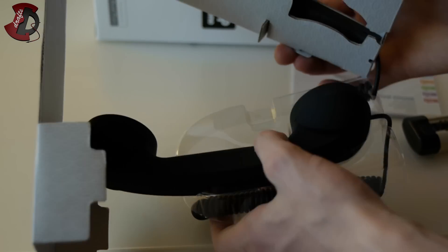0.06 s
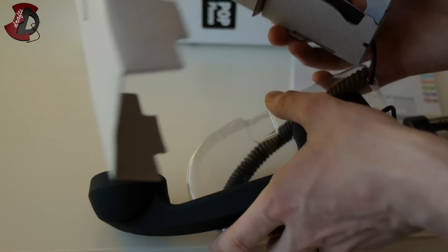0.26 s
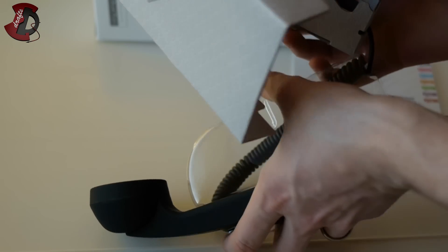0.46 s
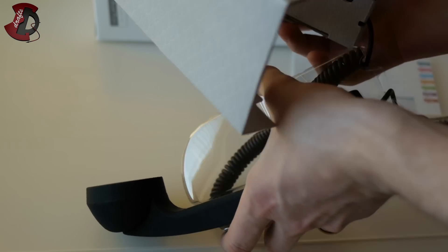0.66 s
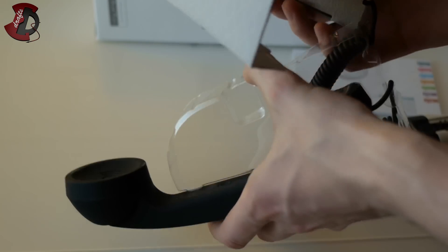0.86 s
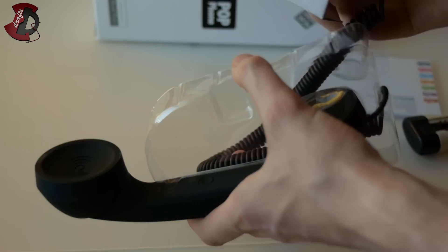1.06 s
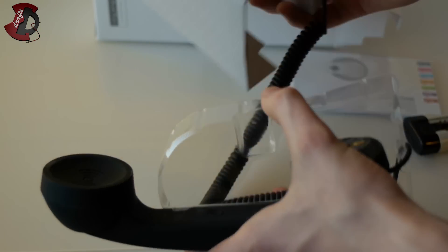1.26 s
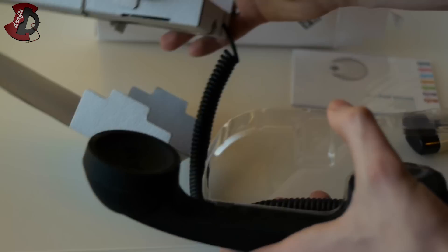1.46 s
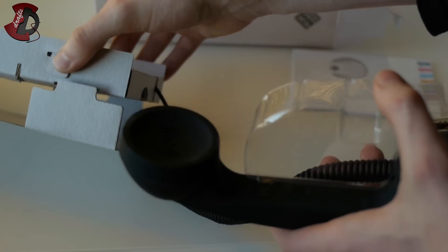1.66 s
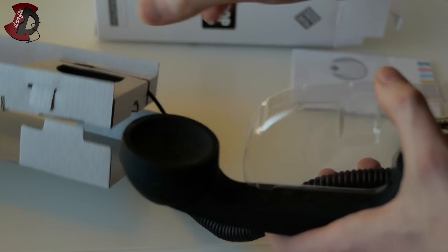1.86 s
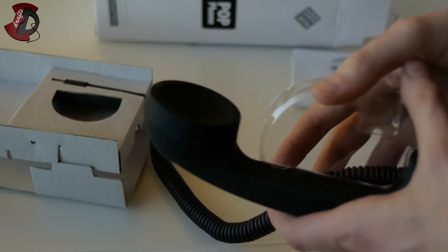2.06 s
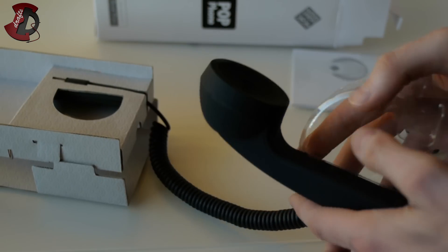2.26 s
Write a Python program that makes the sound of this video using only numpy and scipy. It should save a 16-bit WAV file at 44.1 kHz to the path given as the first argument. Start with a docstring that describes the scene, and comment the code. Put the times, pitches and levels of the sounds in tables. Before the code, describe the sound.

A hard plastic handset thuds onto a table. Cardboard slides and a thin plastic tray crackles, then a box lands and rocks. Softer knocks, snaps and a short scrape follow, heard close in a small, slightly echoing room.

```python
"""A plastic handset and a cardboard box are unpacked on a table in a small, echoing room.
First a thin plastic tray snaps as it buckles in the hands, and at 0.2 s the handset thuds down.
Card slides over card, catching and slipping, and the tray crackles again, loudest at 0.8 s.
At 1.4 s the box is put down and rocks. Around 2 s the handset knocks twice more, softly.
Last, the tray snaps again and fingers bump it, with a short scrape."""
import sys
import numpy as np
from scipy import signal
from scipy.fft import rfft, irfft
from scipy.io import wavfile
from scipy.ndimage import uniform_filter1d, minimum_filter1d

SR = 44100
rng = np.random.default_rng(int(sys.argv[2]) if len(sys.argv) > 2 else 0)


def file_out(sig):
    """Save sig as 16-bit WAV at sys.argv[1]."""
    # one column per channel
    cols = np.atleast_2d(sig).T
    # limit, then scale
    lim = np.clip(cols, -1, 1)
    pcm = np.round(lim * 32767).astype(np.int16)
    wavfile.write(sys.argv[1], SR, pcm)


N = 105840  # 2.4 seconds


def undb(db):
    """Turn decibels into a number to multiply by."""
    return 10 ** (np.asarray(db) / 20)


def fade(t60):
    """A smooth fade that is 60 dB down after t60 seconds."""
    return np.exp(-np.log(1000) * np.arange(N) / SR / t60)


def add(track, start_s, sound):
    """Mix a sound into a track."""
    i = int(np.clip(start_s * SR, 0, N - 1))
    track[:, i:i + sound.shape[-1]] += sound[..., :N - i]


def through(x, response):
    """Let every sample of x set off a copy of the response (convolution)."""
    return signal.fftconvolve(np.atleast_2d(x), np.atleast_2d(response), axes=1)[:, :N]


def gains(points, size):
    """Join (Hz, dB) points into a gain for every frequency."""
    hz, db = np.array(points).T
    log_hz = np.log(np.fft.rfftfreq(size, 1 / SR) + 1)
    return undb(np.interp(log_hz, np.log(hz), db))


def colour(x, points, size=4096):
    """Shape the tone with (Hz, dB) points; white noise keeps its power."""
    cepstrum = irfft(np.log(gains(points, size)))
    cepstrum[1:size // 2] *= 2  # folded so the filter never sounds early
    cepstrum[size // 2 + 1:] = 0
    response = irfft(np.exp(rfft(cepstrum)))
    return through(x, response / np.linalg.norm(response))


# Stereo width. Each row: frequency in Hz, level of the sides against the middle in dB.
STEREO_WIDTH = [(40, -14.5), (125, -23.5), (250, -33.5), (500, -16.5), (1000, -9.5), (2000, -4.5),
                (16000, -1)]
def noise(size=N):
    """Stereo white noise, alike in both ears in the bass and wide in the treble."""
    mid, side = rfft(rng.standard_normal((2, size)))
    width = gains(STEREO_WIDTH, size)
    left_right = np.array([mid + width * side, mid - width * side])
    return irfft(left_right / np.hypot(1, width), size)


def puff(t60, size=16384):
    """A puff of noise that dies away."""
    return noise(size) * fade(t60)[:size]


# Tone of the background. Each row: frequency in Hz, boost or cut in dB.
BACKGROUND_TONE = [(25, -54), (55, -4), (95, 6), (160, -1.5), (330, 6.5), (700, -5.5), (2000, -8.5),
                   (6000, -17), (11000, -24), (16000, -23.5)]
def background():
    """A faint, steady, low rush fills the room."""
    return undb(-59.5) * colour(noise(), BACKGROUND_TONE)


# Tone of the echo. Each row: frequency in Hz, boost or cut in dB.
ECHO_TONE = [(60, -23.5), (250, 11.5), (600, 5.5), (1500, -2), (5500, -1.5), (10000, -3.5), (16000, -8)]
def room_echo(onset_s=0.0013, low_t60=0.38, treble_t60=0.28):
    """The walls answer a click within milliseconds; the treble dies sooner."""
    wash = noise()
    low = signal.sosfilt(signal.butter(1, 7000, fs=SR, output="sos"), wash)
    tail = low * fade(low_t60) + (wash - low) * fade(treble_t60)
    tail *= 1 - np.exp(-(np.arange(N) / SR / onset_s) ** 2)
    return colour(tail / np.linalg.norm(tail[0]), ECHO_TONE)


# Sliding strokes. Each row: peak time, rise and fall in seconds, level in dB.
# One rise before the peak, or one fall after it, a stroke has 37% of its strength.
SLIDES = [(0.121, 0.029, 0.0093, -47.5), (0.156, 0.013, 0.022, -35.5), (0.471, 0.05, 0.097, -53.5),
          (0.627, 0.014, 0.0069, -50.5), (0.707, 0.037, 0.039, -47.5), (0.781, 0.0052, 0.035, -44.5),
          (0.888, 0.023, 0.025, -63), (1.234, 0.014, 0.023, -59.5), (1.551, 0.0038, 0.048, -48.5),
          (1.644, 0.015, 0.034, -50), (1.77, 0.029, 0.0089, -58.5), (1.946, 0.0053, 0.039, -53),
          (2.065, 0.044, 0.12, -50), (2.155, 0.014, 0.024, -34), (2.286, 0.0035, 0.022, -31)]
# Tone of the sliding. Each row: frequency in Hz, boost or cut in dB.
SLIDE_TONE = [(100, -15.5), (420, -1), (850, -1), (1900, 2), (3400, -0.5), (4400, -2.5), (5400, 0.5),
              (7800, -12), (10500, -9.5), (13000, -18), (16000, -18.5)]
def sliding(catches_per_s=700, spread_db=2.5, hiss_db=-1.5):
    """Sliding card and plastic catch and slip in many tiny clicks over a soft hiss."""
    t = np.arange(N) / SR
    effort = sum(undb(db) * np.exp(-np.maximum((peak - t) / rise, (t - peak) / fall))
                 for peak, rise, fall, db in SLIDES)
    catches = rng.random(N) < catches_per_s / SR
    strength = undb(spread_db * np.minimum(rng.exponential(size=N), 5))
    grains = np.sqrt(np.abs(through((catches * strength) ** 2, fade(0.004))))
    clicks = grains / grains.std() / 2 * noise()
    return colour(effort * (clicks + undb(hiss_db) * noise()), SLIDE_TONE)


def ping(hz, t60, sag=0.064, size=8192):
    """One brief note that starts a little high and sags, as thin plastic does when it relaxes."""
    level = fade(t60)[:size]
    pitch_hz = hz * (1 + sag * (level - .5))
    phase = 2 * np.pi * np.cumsum(pitch_hz) / SR
    return np.sqrt(2) * np.sin(phase + rng.uniform(0, np.pi, (2, 1))) * level


# Fingers bumping the tray. Each row: start in seconds, level in dB.
FINGER_BUMPS = [(2.2842, -38.5), (2.294, -35), (2.329, -44)]
# Notes of the whole tray. Each row: pitch in Hz, dB added to the bump's level.
TRAY_NOTES = [(415, -2.5), (885, 3.5), (990, -2), (1590, 3.5), (1940, -2)]
def tray_bumps():
    """Fingers knock the hollow tray; it rings, and the hands quickly damp it."""
    bumps = np.zeros((2, N))
    for start, db in FINGER_BUMPS:
        ring = sum(undb(note_db) * ping(hz, t60=0.064) for hz, note_db in TRAY_NOTES)
        add(bumps, start, undb(db) * ring)
    return bumps


def crackle(t60, step_s=0.0006, spread_db=7):
    """A crease gives way in tiny steps of uneven strength."""
    burst = puff(t60)
    size = burst.shape[1]
    step = (np.arange(size) / SR / step_s).astype(int)
    strength = undb(spread_db * rng.uniform(-1, 1, size))
    return burst * strength[step] / np.sqrt(np.mean(strength ** 2))


# Tray snaps, plus two brief bright rings near 1.65 s as the box scrapes and rocks. Each row: start in
# seconds, level in dB, ring pitch in Hz, dB added for the ring, left minus right in dB.
SNAPS_AND_RINGS = [(0.118, -35.5, 9900, 1, 0), (0.1232, -46, 3650, 7.5, 1), (0.144, -31.5, 1790, -14, 2),
                   (0.157, -36, 3750, -25, -7), (0.6248, -48, 4650, 4, -1), (0.6650, -39, 3540, 5.5, -1),
                   (0.732, -46, 3020, 3.5, 0), (0.7841, -36, 3030, -12, -1), (0.844, -18, 2273, -8, 0),
                   (0.8443, -28, 5170, 4.5, -0.5), (0.861, -34.5, 5210, 4, -7), (0.9126, -34, 3286, 5.5, 3),
                   (0.9131, -32, 9500, 2.5, -2.5), (0.924, -35, 10700, 0, 7),
                   (1.092, -35.5, 2930, -11, -0.5), (1.632, -48, 2690, 19, 5), (1.6623, -48, 2314, 17, 5),
                   (1.873, -47, 2820, -2.5, -2), (1.973, -30, 4220, -5.5, 3), (1.9894, -39, 5300, -11, 2),
                   (2.1399, -27.5, 2510, 1.5, -2.5), (2.151, -33, 5580, 2, -2),
                   (2.1743, -27, 3000, -4.5, 1), (2.3950, -33.5, 9400, -5, -4)]
# Tone of the cracks. Each row: frequency in Hz, boost or cut in dB.
CRACK_TONE = [(60, -50.5), (230, -19.5), (430, -1.5), (650, -11), (1250, -12.5), (1900, 5), (2300, 0),
              (2750, 3), (3350, 3.5), (4300, -5), (5200, 0.5), (7800, -6), (10200, -4), (12500, -12),
              (16000, -21)]
def snaps_and_rings():
    """A crack and a brief ring, as a patch of the thin tray buckles or the box scrapes."""
    cracks, rings = np.zeros((2, 2, N))
    for start, db, hz, ring_db, pan_db in SNAPS_AND_RINGS:
        gain = undb(db + np.array([[pan_db], [-pan_db]]) / 2)
        add(cracks, start, gain * crackle(t60=0.041))
        add(rings, start, gain * undb(ring_db) * ping(hz, t60=0.03))
    return colour(cracks, CRACK_TONE) + rings


def low_ring(notes, drop_t60=0.046, linger_db=-16, spread_s=0.006, size=32768):
    """After a blow, the low notes of table and room swell, drop fast and linger faintly."""
    t = np.arange(size) / SR
    ring = np.zeros(size)
    for hz, db, t60 in notes:
        level = fade(drop_t60) + undb(linger_db) * fade(t60)
        ring += undb(db) * np.sin(2 * np.pi * hz * t) * level[:size]
    ring *= 1 - np.exp(-t / spread_s)  # the shaking takes time to spread over the table
    return ring / np.abs(ring).max()


def struck_spot(x, hz):
    """The spot that is hit boosts the sound near its own pitch."""
    return x + undb(3.5) * signal.lfilter(*signal.iirpeak(hz, Q=4.2, fs=SR), x)


# Tone of the tick as two surfaces meet. Each row: frequency in Hz, boost or cut in dB.
TICK_TONE = [(100, -43.5), (1500, 8), (3500, -6), (5800, -1), (7800, -10), (10300, 1), (13000, -16.5),
             (16000, 1)]
def knocks(blows, notes, thump_tone, walls, thump_t60, tick_top_hz, echo_db=-3, bass_cut_hz=100):
    """Each blow makes a low ring, a thump of many crowded notes and a tick; the last two echo."""
    rings, thumps, ticks = np.zeros((3, 2, N))
    for start, db, thump_db, tick_db, spot_hz in blows:
        add(rings, start, undb(db) * struck_spot(low_ring(notes), spot_hz))
        add(thumps, start, undb(db + thump_db) * struck_spot(puff(thump_t60), spot_hz))
        add(ticks, start, undb(db + tick_db) * puff(t60=0.021))
    soften = signal.butter(2, tick_top_hz, fs=SR, output="sos")
    ticks = signal.sosfilt(soften, colour(ticks, TICK_TONE))
    thumps = colour(thumps, thump_tone)
    echo = undb(echo_db) * through(thumps + undb(-1) * ticks, walls)  # the nearby tick echoes less
    bass_cut = signal.butter(1, bass_cut_hz, "high", fs=SR, output="sos")  # trim the deepest rumble
    return signal.sosfilt(bass_cut, rings + thumps + ticks + echo)


# The box hitting the table. Each row: start in seconds, level in dB,
# dB added for the thump, dB added for the tick, pitch of the struck spot in Hz.
BOX_BLOWS = [(1.4087, -15, -12, -10, 144), (1.4135, -20, -9.5, -36.5, 850), (1.6068, -6.5, -16, -17.5, 367),
             (1.6325, -25, -2.5, -5, 3380), (1.6610, -19, -6.5, -10, 546), (1.6805, -28, -4, -22, 1500)]
# Low ring of table and room when the box lands.
# Each row: pitch in Hz, relative level in dB, seconds for the faint tail to fade.
BOX_LANDING_RING = [(49, -24, 0.77), (142.7, -13.5, 0.41), (236, -5, 0.33), (288.7, -3, 0.38),
                    (321.7, -1.5, 0.21), (416.7, 2, 0.19), (440, -0.5, 0.099), (506, -3, 0.12),
                    (632.6, 1, 0.14), (726, -1, 0.32), (866.4, -16.5, 0.23), (914, -4.5, 0.16),
                    (1133, -18.5, 0.26)]
# Tone of the thump. Each row: frequency in Hz, boost or cut in dB.
BOX_TONE = [(35, -36), (130, -3), (400, 3), (850, 1.5), (1300, 1.5), (2300, -11), (4000, -14.5),
            (8000, -32), (16000, -39)]
def box(walls):
    """The box lands and rocks; card is softer than plastic, so its tick is duller."""
    return knocks(BOX_BLOWS, BOX_LANDING_RING, BOX_TONE, walls, thump_t60=0.063, tick_top_hz=5900)


# The handset hitting the table. Each row: start in seconds, level in dB,
# dB added for the thump, dB added for the tick, pitch of the struck spot in Hz.
HANDSET_BLOWS = [(0.2166, -4.5, -15, -7.5, 494), (0.2275, -7.5, -19.5, -37, 255),
                 (0.2505, -12, -20, -28, 566), (1.106, -55, -4, -33, 173), (1.9740, -23, -9.5, -30, 266),
                 (2.1255, -31, -12.5, -27, 410)]
# Low ring of table and room when the handset lands.
# Each row: pitch in Hz, relative level in dB, seconds for the faint tail to fade.
HANDSET_LANDING_RING = [(138, -16.5, 0.21), (146, -1.5, 0.29), (237, 3.5, 0.43), (285.2, 5, 0.4),
                        (321, -4, 0.4), (415.8, 6, 0.49), (439.9, 3, 0.13), (456, 3, 0.077),
                        (522.6, -4, 0.51), (542.6, 2.5, 0.31), (619, 0, 0.41), (634, -3.5, .55),
                        (713, -5, 0.32), (1011, -14, .3)]
# Tone of the thump. Each row: frequency in Hz, boost or cut in dB.
HANDSET_TONE = [(35, -36), (110, -7.5), (400, -2.5), (620, -5), (800, -8), (1100, -7.5), (1400, -11.5),
                (1950, -10.5), (2800, -23), (6000, -44), (16000, -63)]
def handset(walls):
    """The hard plastic handset thuds on the table with a bright tick."""
    return knocks(HANDSET_BLOWS, HANDSET_LANDING_RING, HANDSET_TONE, walls,
                  thump_t60=0.12, tick_top_hz=16000)


def scene():
    """Rustles, snaps and knocks share one room and its quiet background."""
    walls = room_echo()
    handling = sliding() + tray_bumps() + snaps_and_rings()
    handling_echo = undb(-7.5) * through(handling, walls)
    return background() + handling + handling_echo + box(walls) + handset(walls)


def record(dry, top_hz=16000):
    """A fast limiter holds down the loudest peaks, and the highest treble is cut."""
    span = int(.004 * SR)
    needed_gain = 1 / np.maximum(np.abs(dry).max(axis=0), 1)
    gain = uniform_filter1d(minimum_filter1d(needed_gain, span), span)
    return signal.sosfilt(signal.ellip(8, .2, 70, top_hz, fs=SR, output="sos"), gain * dry)


dry = scene()
out = record(dry)
file_out(out)
```